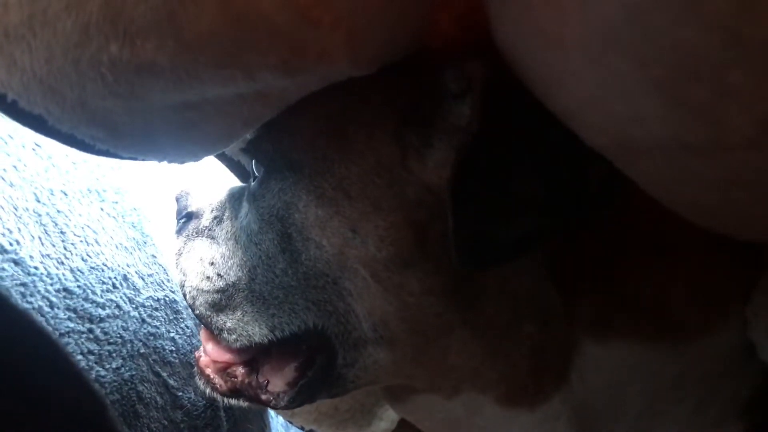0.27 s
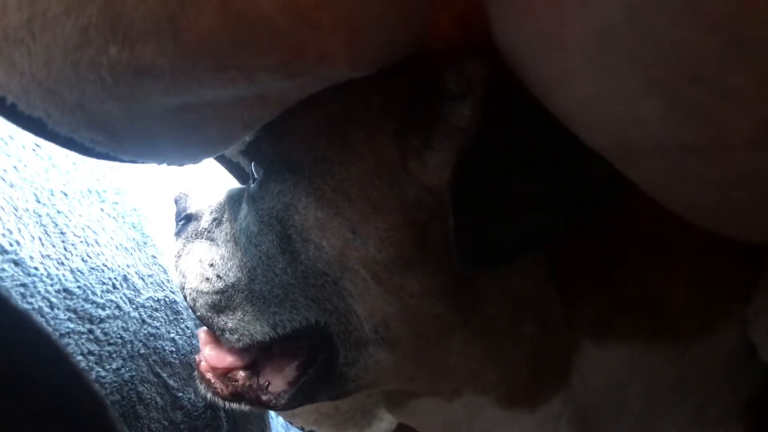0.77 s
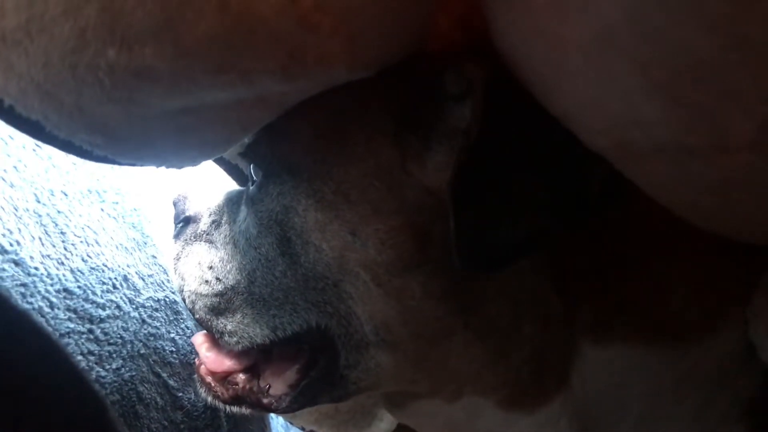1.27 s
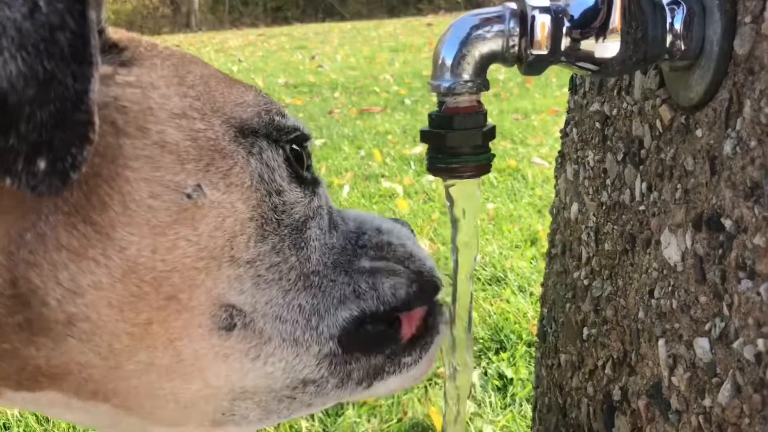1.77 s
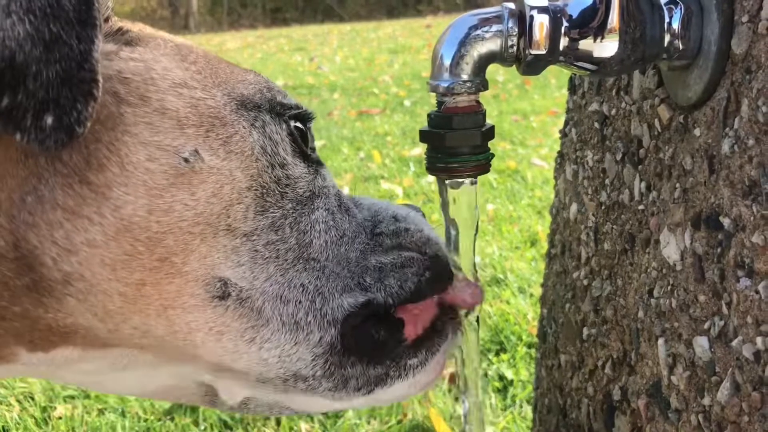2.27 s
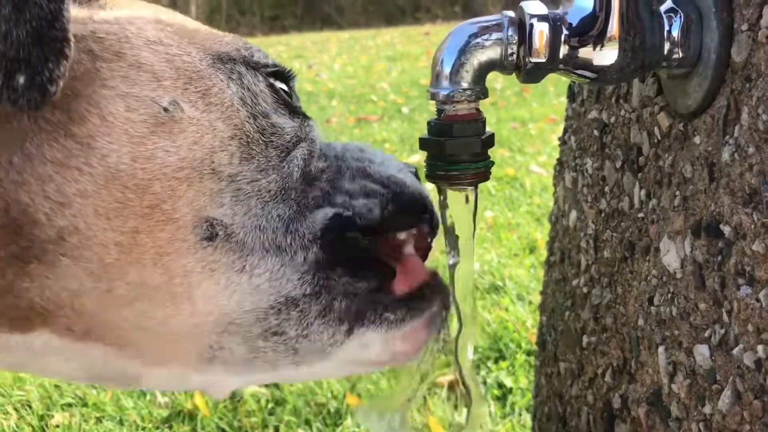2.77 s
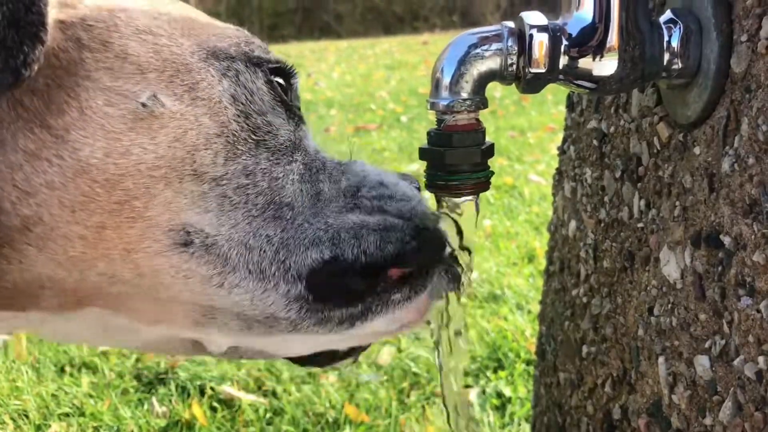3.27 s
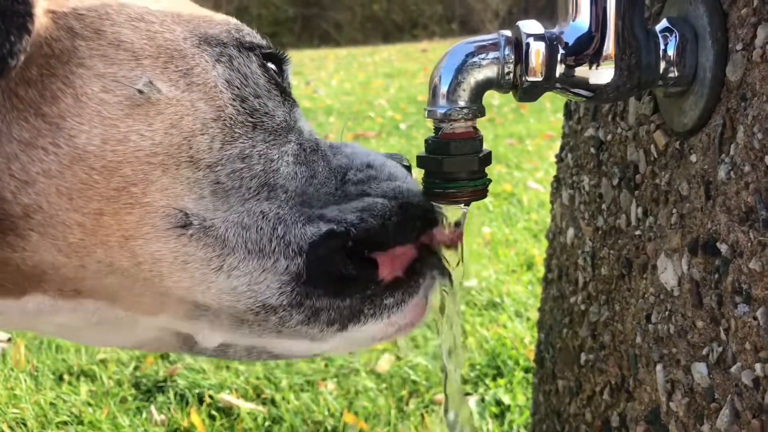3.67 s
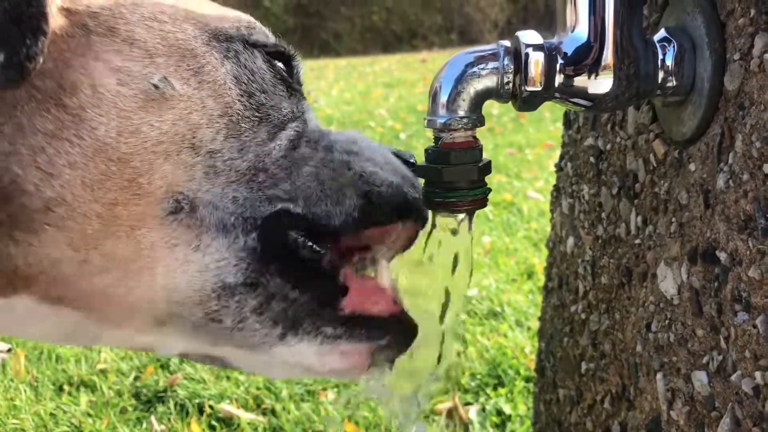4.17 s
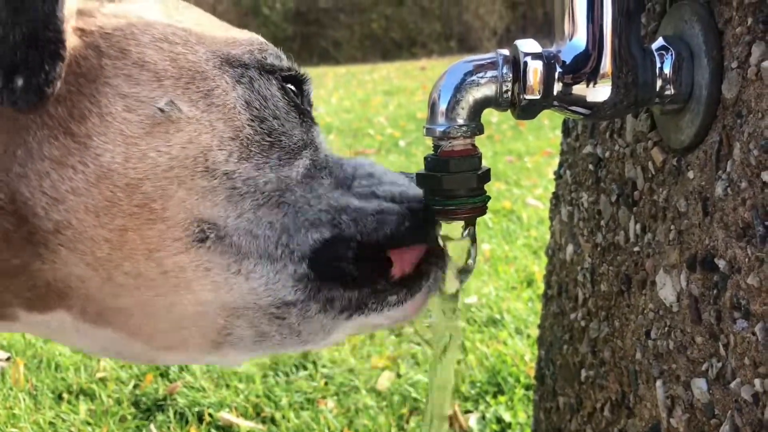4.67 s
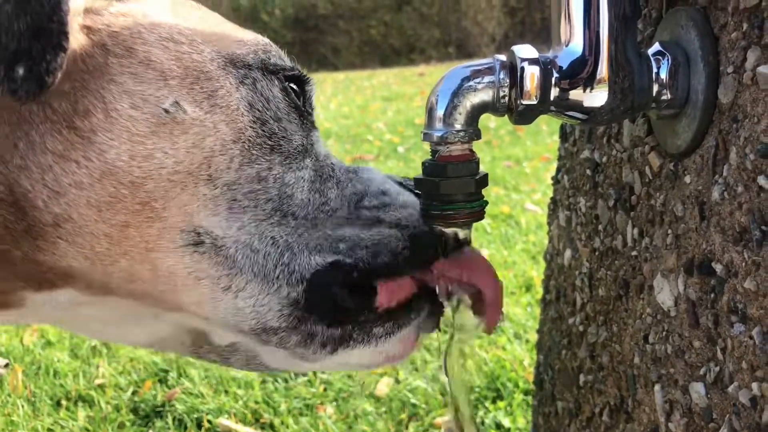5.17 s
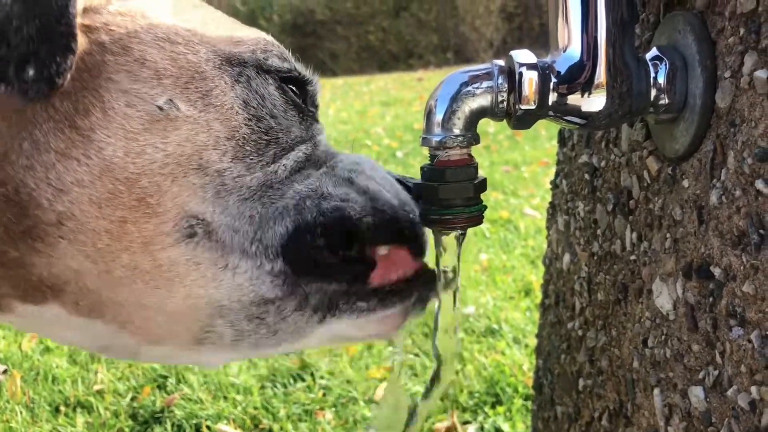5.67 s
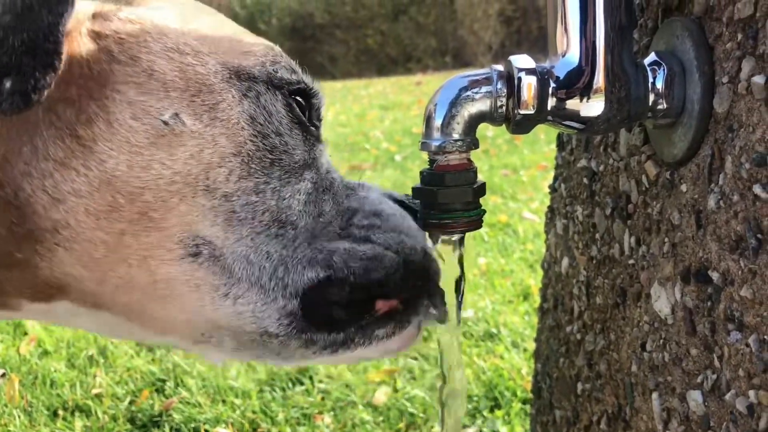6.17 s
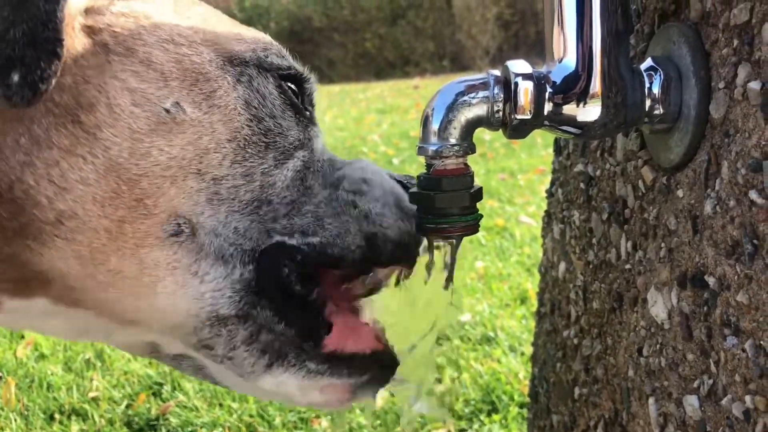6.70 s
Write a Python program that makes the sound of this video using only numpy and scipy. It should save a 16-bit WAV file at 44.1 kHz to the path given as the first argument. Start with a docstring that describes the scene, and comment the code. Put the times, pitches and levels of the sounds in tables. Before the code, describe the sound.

First a deep, soft hum climbs in pitch, swells and drops away. Then abruptly an outdoor tap runs, its thin stream pattering and hissing on wet ground, while a dog laps right at the microphone: quick slurps, sticky smacks, splashes, crisp water snaps and a few hollow mouth clucks, about three laps a second. A faint low rumble and distant machinery hum lie underneath.

```python
"""A dog laps at the stream of an outdoor tap, close to the microphone, after a low hum has swelled and gone.
Its tongue smacks as torn noise through mouth resonances; air pockets, drips and wet films ring as short pings.
Slurps and spray are bubble showers and noise driven lap by lap; slipping knocks make the throat cluck.
Under it the stream patters as bubbles and hiss, over a filtered-noise rumble and far machinery of sine tones."""
import sys
import numpy as np
from scipy import signal
from scipy.fft import rfft, irfft
from scipy.io import wavfile
from scipy.ndimage import uniform_filter1d

SR = 44100
rng = np.random.default_rng(int(sys.argv[2]) if len(sys.argv) > 2 else 0)


def output_pcm(signal):
    """Save a mono or channel-first signal as 16-bit PCM at the path in sys.argv[1].

    Samples are clipped to [-1, 1] before scaling.
    """
    pcm = np.clip(np.atleast_2d(signal).T, -1, 1) * 32767
    wavfile.write(sys.argv[1], SR, np.round(pcm).astype(np.int16))


N = 305771

TAP_START_S = 1.672  # the hum gives way to the tap and the dog
TOP_HZ = 15900  # upper edge of the recorded band


def undb(db):
    """Decibels to gain."""
    return 10 ** (np.asarray(db) / 20)


def unit(x):
    """Scale to rms 1."""
    return x / np.sqrt(np.mean(x ** 2))


def curves(table):
    """Draw straight lines through each column of a table, one value a sample."""
    s, *columns = np.transpose(table)
    return [np.interp(np.arange(N) / SR, s, c) for c in columns]


def add(out, s, sound):
    """Mix a short sound in at time s."""
    i = min(max(int(s * SR), 0), N)
    out[i:i + len(sound)] += sound[:N - i]


def filtered(x, points, size=4096):
    """Causal, minimum-phase filter through (Hz, dB) points."""
    hz, db = np.transpose(points)
    bins = np.maximum(np.arange(size // 2 + 1) * SR / size, 1)
    cepstrum = irfft(np.log(undb(np.interp(np.log(bins), np.log(hz), db))))
    # folding the cepstrum forward in time puts the energy first
    cepstrum[1:size // 2] *= 2
    cepstrum[size // 2 + 1:] = 0
    return signal.fftconvolve(x, irfft(np.exp(rfft(cepstrum))))[:N]


def colour(x, points):
    """Filter a sound through (Hz, dB) points, then set it to rms 1."""
    return unit(filtered(x, points))


def resonate(x, hz, width_hz):
    """One damped resonance, gain 1 at its centre."""
    return signal.lfilter(*signal.iirpeak(hz, hz / width_hz, fs=SR), x)


def walk(rate):
    """Smooth random wander at about this rate in Hz; spread 1."""
    k = max(int(SR / rate), 1)
    smooth = uniform_filter1d(rng.standard_normal(N), k, mode="wrap")
    return unit(uniform_filter1d(smooth, k // 2 + 1, mode="wrap"))


def ping(hz, open_s, glide):
    """An air pocket rings up as it opens, then dies away while its pitch slides."""
    age = np.arange(int(7 * open_s * SR) + 2) / (open_s * SR)
    pitch = np.minimum(hz * (1 + glide * np.tanh(age - 1)), SR / 2)
    swell = (age * np.exp(1 - age)) ** 1.53
    return swell * np.sin(2 * np.pi * np.cumsum(pitch) / SR)


def bubbles(rate, low_hz, high_hz, cycles, spread_db, glide, count=6000):
    """A random shower of pings of all sizes, rate a second, while the tap runs."""
    out, span = np.zeros(N), N / SR - TAP_START_S
    chance = rng.random((count, 3))
    size = np.clip(rng.standard_normal(count), -2, 2)
    for (when, pitch, ring), gain in zip(chance[:int(rate * span)], undb(spread_db * size)):
        hz = low_hz * (high_hz / low_hz) ** pitch
        open_s = cycles * (.5 + ring) / hz
        add(out, TAP_START_S + when * span, gain * ping(hz, open_s, glide))
    return unit(out)


def splash(hz, ratio, rise_s, decay_s):
    """A short burst of tearing water: noise within a frequency ratio of hz, peak rms near 1."""
    t = np.arange(SR // 20) / SR
    edges = [hz / (1 + ratio), min(hz * (1 + ratio), .45 * SR)]
    band = signal.butter(1, edges, "bandpass", fs=SR, output="sos")
    shape = np.tanh(t / rise_s) ** 2 * np.exp(-t / decay_s)
    return unit(signal.sosfilt(band, rng.standard_normal(len(t)))) * shape / shape.max()


def mist(flicker_db, rate, count=8):
    """Droplets too fine to tell apart: noise in bands that each sparkle on their own."""
    edges = np.linspace(2000, 17000, count + 1)
    out = np.zeros(N)
    for edge_pair in zip(edges, edges[1:]):
        band = signal.butter(2, edge_pair, "bandpass", fs=SR, output="sos")
        noise = signal.sosfilt(band, rng.standard_normal(N))
        out += noise * undb(flicker_db * walk(rate))
    return unit(out)


def rumble():
    """A low outdoor rumble of two noise layers; the upper one grows, so it sounds fuller."""
    # spectrum of the steady deep layer: freq_hz, gain_db [Hz, dB]
    deep_spectrum = [(22, -25.5), (35, -14), (60, 1.5), (125, 0), (170, -2), (320, -15), (450, -17.5),
                     (900, -37.5)]
    # spectrum of the growing upper layer: freq_hz, gain_db [Hz, dB]
    top_spectrum = [(100, -30.5), (170, 1), (225, 1), (320, -4), (450, -13), (900, -43.5)]
    # swell of the upper layer: time_s, level_db [s, dB]
    top_levels = [(2, -56.5), (3.8, -49), (6.9, -48)]
    top_db, = curves(top_levels)
    deep = undb(-43.0) * colour(rng.standard_normal(N), deep_spectrum)
    return deep + undb(top_db) * colour(rng.standard_normal(N), top_spectrum)


def engine():
    """Far machinery: an engine slowly gaining speed and overtones beside a steady hum, both wavering in level."""
    # speed of the far engine: time_s, firing_rate_hz [s, Hz]
    speed = [(1.7, 72.8), (3.5, 74.45), (6.9, 76.6)]
    # its harmonics: multiple, level_db [of the firing rate, dB rms before wavering]
    orders = [(1, -46.5), (2, -53), (3, -56.5)]
    drone_hz, drone_db = 121.6, -50.5
    open_s = 3.5  # the overtones have grown in by this time
    hz, = curves(speed)
    t = np.arange(N) / SR
    phase = 2 * np.pi * np.cumsum(hz) / SR
    opening = np.minimum(t / open_s, 1)
    firing = np.zeros(N)
    for k, db in orders:
        # higher harmonics open later
        firing += opening ** (k - 1) * undb(db + 2 * walk(1.94)) * np.sin(round(k) * phase)
    drone = undb(drone_db + 2 * walk(2.05)) * np.sin(2 * np.pi * drone_hz * t)
    return np.sqrt(2) * (firing + drone)


def hum():
    """A deep hum, perhaps an engine gathering speed, with thin upper tones and a dull rush."""
    # course of the hum: time_s, pitch_hz, upper_tone_hz, level_db [s, Hz, Hz, dB rms of the deep tone]
    course = [(0, 34.75, 159.3, -58), (.55, 35.44, 174, -48), (.8, 39.4, 185.7, -41),
              (1.15, 46.7, 205.2, -32), (1.38, 51.3, 216, -33), (1.5, 54.9, 226, -39.5),
              (1.66, 54, 236, -69)]
    # spectrum of the rush: freq_hz, gain_db [Hz, dB]
    rush_spectrum = [(20, -37), (35, -11), (65, 8), (130, -5), (280, -11.5), (450, -23), (1000, -32),
                     (2500, -39), (6000, -41.5), (16000, -48)]
    fade_start_s = 1.13  # the upper tone and the rush fade from here until the tap
    octave_db, octave_hold_s, octave_fall_db_per_s = -46, 0.41, 27
    t = np.arange(N) / SR
    hz, upper_hz, deep_db = curves(course)
    fade = np.clip((TAP_START_S - t) / (TAP_START_S - fade_start_s), 0, 1)
    overtone_db = octave_db - octave_fall_db_per_s * np.maximum(t - octave_hold_s, 0)
    # the upper tone and the rush take only a share of the swell
    upper_db = -48.5 + 0.26 * deep_db
    rush_db = -48.5 + 0.072 * deep_db
    phase = 2 * np.pi * np.cumsum(hz) / SR
    deep = np.sin(phase) + undb(-29) * np.sin(3 * phase)
    overtones = np.sin(2 * phase) + undb(-15) * np.sin(3 * phase)
    upper = np.sin(2 * np.pi * np.cumsum(upper_hz) / SR) + undb(-15) * np.sin(6.7 * phase)
    tones = undb(deep_db) * deep * (t < TAP_START_S)
    tones = tones + undb(overtone_db) * overtones + fade * undb(upper_db) * upper
    rush = undb(rush_db) * colour(rng.standard_normal(N), rush_spectrum)
    return np.sqrt(2) * tones + fade * rush


def stream():
    """The jet lands on wet ground: dense patter, sparser longer-ringing gurgles, fizzing droplets, fine hiss."""
    # the jet hitting the ground: time_s, level_db [s, dB before swaying]
    jet = [(1.7, -43.5), (2.5, -47.5), (3, -45), (6.9, -45.5)]
    # spectrum of the landing jet: freq_hz, gain_db [Hz, dB]
    spectrum = [(200, -27), (420, -2), (560, -3), (690, -4.5), (880, -7.5), (1200, -6), (1680, -10),
                (2150, -15), (4000, -17.5), (6200, -14.5), (9000, -37), (16000, -22)]
    jet_db, = curves(jet)
    patter = bubbles(rate=650, low_hz=520, high_hz=2310, cycles=2.1, spread_db=4, glide=0.12)
    gurgle = 0.75 * bubbles(rate=45, low_hz=600, high_hz=2300, cycles=3.6, spread_db=2.5, glide=0.1)
    fizz = bubbles(rate=900, low_hz=2300, high_hz=16000, cycles=2.2, spread_db=7, glide=0.07)
    hiss = rng.standard_normal(N)
    sway_db = 1.3 * walk(25)
    water = 0.36 * (patter + gurgle) + 0.5 * fizz + 0.5 * hiss
    return undb(jet_db + sway_db) * colour(water, spectrum)


def clucks(gap_s=0.0055, count=5):
    """The tongue peels off the palate in uneven slips; each knocks the mouth cavity, which rings briefly."""
    # clucks deep in the mouth: start_s, pitch_hz, level_db, length_s [s, Hz at the first slip, dB, s]
    cluck_table = [(3.9555, 507, -25.5, .013), (4.2858, 610, -23, .021), (5.3953, 600, -23.5, .016),
                   (5.735, 625, -23.5, .02), (6.499, 594, -26.5, .013), (6.843, 610, -25, .013)]
    # the cavity shrinks as the tongue lifts, so its pitch climbs from slip to slip by this share a second
    rise_per_s, ring_s = 5.8, 0.0021
    out, t = np.zeros(N), np.arange(SR // 20) / SR
    knock = (1 - np.exp(-t / .0005)) * np.exp(-t / ring_s)
    for s, hz, db, length in cluck_table:
        for k, (late, size, detune) in enumerate(rng.standard_normal((count, 3))):
            if k * gap_s < length:
                pitch = hz * (1 + rise_per_s * k * gap_s + .06 * detune)
                slip = 2 * knock * np.sin(2 * np.pi * pitch * t)
                add(out, s + gap_s * (k + 0.1 * late), undb(db + 1.5 * size) * slip)
    return signal.sosfilt(signal.butter(2, 260, "highpass", fs=SR, output="sos"), out)


def snaps():
    """A film breaks in a cycle or two and leaves a few milliseconds of mist."""
    # water films snapping: start_s, pitch_hz, level_db [s, Hz, dB shared by ping and mist]
    snap_table = [(1.873, 8900, -13.5), (1.962, 12500, -21), (1.9706, 12800, -14.5), (2.0817, 12600, -12),
                  (2.096, 12500, -17), (2.1576, 8650, -22.5), (2.1891, 7500, -13), (2.56, 12520, -20),
                  (2.6173, 8200, -20), (2.6905, 10200, -21.5), (2.8833, 10500, -16.5), (2.89, 9700, -16),
                  (3.118, 14700, -13.5), (3.216, 14100, -15), (3.247, 13100, -22), (3.3354, 14800, -20),
                  (3.3574, 11600, -20), (3.8355, 9090, -22), (3.967, 11300, -20.5), (4.021, 9000, -21),
                  (4.543, 9100, -21), (5.069, 12400, -16.5), (5.0902, 8300, -18), (5.2225, 12970, -16),
                  (5.4294, 11400, -19), (5.708, 15000, -19), (5.7508, 8200, -8), (5.994, 6900, -17.5),
                  (6.1013, 11300, -23), (6.1213, 12400, -18), (6.1433, 11000, -21), (6.539, 12690, -16.5),
                  (6.557, 9500, -8.5), (6.8703, 8300, -20), (6.904, 11400, -14), (6.913, 11300, -21.5)]
    out = np.zeros(N)
    for s, hz, db in snap_table:
        add(out, s, undb(db + 4.5) * ping(hz, .95 / hz, glide=-.1))
        add(out, s, undb(db - 10) * splash(hz, ratio=.6, rise_s=.0004, decay_s=.0011))
    return out


def drips():
    """Single bubbles chirp as they near the surface or are drawn into the mouth."""
    # clean sliding bubbles: start_s, pitch_hz, peak_db, open_s, glide [s, Hz, dB, s, share of the pitch]
    drip_table = [(1.745, 1930, -36, 0.003, -0.023), (2.067, 1940, -39, 0.0072, -0.04),
                  (2.633, 3260, -24, 0.0015, 0.21), (2.7038, 4080, -21, 0.0025, 0.71),
                  (3.324, 4650, -26.5, 0.001, 0.27), (3.5813, 6020, -17.5, 0.0011, 0.17),
                  (4.495, 1370, -34, 0.0046, 0.0056), (6.042, 734, -21, 0.0057, -0.11),
                  (6.462, 2380, -34, 0.0026, .04)]
    out = np.zeros(N)
    for s, hz, db, open_s, glide in drip_table:
        add(out, s, undb(db) * ping(hz, open_s, glide))
    return out


def pops(count=3):
    """Each pocket rings at its own pitch; water around it tears and throws off a few smaller bubbles."""
    # air pockets at tongue and lips: start_s, pitch_hz, peak_db, tear_s [s, Hz, dB, s of the tear's rise]
    pop_table = [(1.867, 706, -33.5, .0014), (1.926, 3230, -34, 0.0008), (1.984, 4360, -27.5, 0.00065),
                 (2.117, 4470, -20, 0.0006), (2.1688, 5330, -19.5, 0.00032), (2.1917, 2560, -31.5, .0009),
                 (2.198, 6220, -21, 0.00028), (2.306, 6350, -24.5, 0.00021), (2.535, 6400, -22, 0.00014),
                 (2.5495, 6260, -16, 0.0003), (2.748, 3260, -13, 0.00023), (2.7663, 686, -27.5, 0.0029),
                 (2.857, 6250, -20.5, 0.00048), (3.0545, 4430, -26, 0.00044), (3.0848, 3900, -24, 0.00048),
                 (3.1094, 3800, -21.5, 0.00053), (3.1732, 1636, -6.5, 0.0011), (3.222, 586, -23.5, 0.00085),
                 (3.266, 3600, -28.5, 0.0014), (3.3138, 2350, -20, 0.00025), (3.3355, 3700, -25, 0.00033),
                 (3.3663, 3160, -13.5, 0.00029), (3.599, 3920, -19, 0.0004), (3.669, 5230, -13, 0.000078),
                 (3.693, 2730, -16.5, 0.00017), (3.905, 1870, -18.5, 0.0018), (3.911, 1780, -15, 0.001),
                 (4.0101, 1930, -16, 0.0003), (4.0395, 5600, -19, 0.0003), (4.3746, 5800, -11.5, 0.000063),
                 (4.383, 5660, -16.5, 0.00018), (4.4483, 6440, -9, 0.00032), (4.74, 5670, -16.5, 0.00023),
                 (4.7559, 940, -21, 0.00056), (4.807, 5800, -18, 0.00056), (4.9062, 3730, -25.5, 0.00075),
                 (4.943, 670, -29, 0.003), (5.058, 596, -25.5, 0.0022), (5.0678, 2950, -21, 0.0012),
                 (5.0941, 4250, -23.5, 0.00039), (5.2223, 527, -29.5, 0.0029), (5.1385, 6330, -23, 0.00024),
                 (5.4136, 5160, -12, 0.00021), (5.478, 2900, -24.5, 0.00034), (5.6989, 2330, -17.5, 0.0019),
                 (5.748, 2800, -31, 0.0009), (5.8015, 4200, -32, 0.00022), (6.1058, 2420, -23, .001),
                 (6.115, 2460, -14, 0.0011), (6.1598, 4380, -20.5, 0.0003), (6.1952, 2880, -15, 0.00021),
                 (6.2039, 4060, -18, 0.00024), (6.2074, 638, -28, 0.0054), (6.3172, 3490, -26.5, 0.0014),
                 (6.4436, 670, -28, 0.002), (6.4886, 4560, -24, 0.00073), (6.568, 2350, -20, 0.00043),
                 (6.5815, 1280, -28.5, 0.0012), (6.591, 1000, -30, 0.001), (6.6665, 1040, -19, 0.0018),
                 (6.6996, 4100, -18, 0.00018), (6.9038, 5370, -13.5, 0.00023)]
    out = np.zeros(N)
    for s, hz, db, tear_s in pop_table:
        # the pocket opens a little slower than the water tears
        add(out, s, undb(db) * ping(hz, tear_s * 1.18, glide=0.068))
        tear = splash(min(1.3 * hz, TOP_HZ), ratio=0.8, rise_s=tear_s, decay_s=.0016)
        add(out, s, undb(db - 16) * tear)
        for late, smaller in rng.random((count, 2)):
            small_hz = min(hz * (2.33 + 2.9 * smaller), TOP_HZ)
            add(out, s + 6 * tear_s * late, undb(db - 18.0) * ping(small_hz, 3.0 / small_hz, glide=0.065))
    return out


def smacks(tears_per_s=1500):
    """A wet film tears in a run of clicks, then a few stragglers; they ring the mouth, each smack its own way."""
    # the tongue leaves the palate: start_s, lower_hz, upper_hz, level_db, swell_s
    # [s, Hz and Hz of the mouth resonances, dB, s]
    smack_table = [(2.829, 1220, 1820, -31.5, 0.0029), (3.571, 1940, 4100, -27.5, 0.004),
                   (3.9048, 1240, 1820, -24.5, 0.0027), (4.036, 1330, 2360, -29, 0.00042),
                   (4.1237, 1130, 2340, -27.5, 0.002), (4.245, 1210, 2260, -32.5, 0.0031),
                   (4.4435, 980, 1590, -26, 0.0014), (4.992, 1170, 2160, -31, 0.0028),
                   (4.998, 1220, 2170, -20.5, 0.0014), (5.131, 696, 1630, -31.5, 0.0019),
                   (5.222, 1120, 2620, -30, 0.0015), (5.344, 1120, 2360, -29, 0.0031),
                   (5.697, 775, 2340, -24, 0.0017), (6.204, 1110, 1710, -32, 0.0036),
                   (6.443, 1190, 2400, -27, 0.0028), (6.559, 1610, 2470, -32, 0.0025),
                   (6.665, 1020, 2360, -35, 0.0029), (6.794, 1310, 1750, -34.5, 0.0054)]
    lower_width_hz, upper_width_hz = 220, 190  # soft cheeks damp the mouth resonances
    teeth_hz, teeth_db, teeth_width_hz = 3530, -13, 220  # the small cavity behind the front teeth
    tail_share, tail_s = 0.12, 0.013  # the last threads of saliva parting
    out, t = np.zeros(N), np.arange(SR // 20) / SR
    for s, lower_hz, upper_hz, db, swell_s in smack_table:
        shape = t / swell_s * np.exp(1 - t / swell_s) + tail_share * np.exp(-t / tail_s)
        noise = rng.standard_normal(len(t))
        clicks = rng.random(len(t)) < tears_per_s / SR
        tear = shape * noise * (clicks + .04)  # sparse clicks over a faint floor
        ring = resonate(tear, lower_hz, lower_width_hz)
        ring = ring + undb(-3) * resonate(tear, upper_hz, upper_width_hz)
        ring = ring + undb(teeth_db) * resonate(tear, teeth_hz, teeth_width_hz)
        # the energy follows the swell's shape, however the random tears fall
        add(out, s, undb(db) * ring * np.linalg.norm(shape) / np.linalg.norm(ring))
    return out


def tongue():
    """Gains in the mouth and at the lips: a slurp swells and stops, the tongue hits the jet, then pulls back."""
    # laps: smack_s, slurp_db, hit_wait_s, splash_db, release_s, pull_wait_s, pull_db
    # [s, dB, s after the smack, dB, s, s after the smack, dB]
    laps = [(1.816, -53.5, 0.18, -38.5, 0.0066, 0.12, -50), (2.089, -65, 0.088, -42, 0.11, 0.3, -63),
            (2.529, -40, 0.088, -40.5, 0.48, .22, -44.5), (2.84, -52, 0.051, -38.5, 0.013, 0.23, -42.5),
            (3.178, -40, 0.082, -41, 0.11, 0.29, -40.5), (3.578, -36, 0.089, -35, 0.12, 0.24, -39.5),
            (3.906, -38, 0.064, -33.5, 0.019, 0.23, -37), (4.247, -39, 0.055, -42, 0.26, 0.22, -44.5),
            (4.667, -39, 0.074, -34, 0.041, 0.24, -36), (5.003, -41, 0.071, -37, 0.18, 0.24, -37),
            (5.352, -41.5, 0.053, -35, 0.067, 0.23, -42.5), (5.707, -36, 0.079, -31, 0.023, 0.11, -65),
            (6.115, -35, 0.076, -31.5, 0.041, 0.22, -40), (6.455, -36, 0.054, -33, 0.068, 0.23, -40.5),
            (6.803, -40.5, 0.071, -39, 0.042, 0.23, -43)]
    suck_rise_s, suck_shut_s = 0.03, 0.0082  # the slurp builds towards the smack and stops as the jaws shut
    splash_attack_s, splash_hold_s = 0.0069, 0.01
    pull_back_width_s = 0.018  # the tongue drags water into the mouth in a short swell
    suck_spray_db, splash_slurp_db = 2.5, -14.5  # spray thrown by a slurp; froth stirred by a splash
    trickle_mouth_db, trickle_lips_db = -62.5, -47.5  # the jet running over the muzzle between laps
    t = np.arange(N) / SR
    suck, hit = np.zeros(N), np.zeros(N)
    for s, slurp_db, wait_s, splash_db, release_s, pull_s, pull_db in laps:
        age = t - s
        suck += undb(slurp_db) * np.exp(np.minimum(age / suck_rise_s, -age / suck_shut_s))
        suck += undb(pull_db) * np.exp(-np.abs(age - pull_s) / pull_back_width_s)
        attack = np.clip((age - wait_s) / splash_attack_s, 0, 1)
        release = np.exp(-np.maximum(age - wait_s - splash_hold_s, 0) / release_s)
        hit += undb(splash_db) * attack * release
    # the parts add as powers
    mouth = np.hypot(np.hypot(suck, undb(splash_slurp_db) * hit), undb(trickle_mouth_db))
    lips = np.hypot(np.hypot(hit, undb(suck_spray_db) * suck), undb(trickle_lips_db))
    return mouth, lips


def lapping():
    """The tongue churns the jet: froth and stray pops in the mouth, spray and stray snaps at the lips."""
    # spectrum of the slurp in the mouth: freq_hz, gain_db [Hz, dB]
    slurp_spectrum = [(400, 9.5), (700, -2), (1150, -1.5), (1750, 5.5), (2400, -2.5), (2900, -6),
                      (3800, -1), (5200, -14), (8000, -56)]
    # spectrum of the spray at the lips: freq_hz, gain_db [Hz, dB]
    spray_spectrum = [(2500, -15), (4200, 0), (6000, 1), (8000, 0), (12500, -2), (16000, -4)]
    mouth, lips = tongue()
    spurts = undb(3.2 * walk(130))  # shared by slurp and spray
    froth = bubbles(rate=480, low_hz=1000, high_hz=5200, cycles=2.0, spread_db=5, glide=0.08)
    froth = unit(np.diff(froth, prepend=0))  # small bubbles radiate better
    slurp = colour((froth + 0.5 * rng.standard_normal(N)) * spurts, slurp_spectrum)
    drops = bubbles(rate=770, low_hz=3660, high_hz=15640, cycles=3.9, spread_db=6.0, glide=0.049)
    drops = unit(np.diff(drops, prepend=0))
    spray = colour((0.55 * drops + mist(flicker_db=8.0, rate=150)) * spurts, spray_spectrum)
    stray_pops = bubbles(rate=50, low_hz=1100, high_hz=5500, cycles=2.5, spread_db=3, glide=0.12)
    stray_snaps = bubbles(rate=45, low_hz=4500, high_hz=14500, cycles=0.8, spread_db=3.5, glide=-0.05)
    in_mouth = undb(-0.9) * slurp + undb(-7) * stray_pops
    at_lips = undb(-2.5) * spray + undb(-5.5) * stray_snaps
    return mouth * in_mouth + lips * at_lips


def surroundings(x, echo_db, decay_s, count=6):
    """Muzzle, tap and post scatter very short echoes that shift as the head and the water move."""
    t = np.arange(SR // 20) / SR
    scattered = np.zeros(N)
    for noise in rng.standard_normal((count, len(t))):
        echo = noise * np.exp(-t / decay_s) * (t > .001)
        scattered += walk(31.0) * signal.oaconvolve(x, echo / np.linalg.norm(echo))[:N]
    return x + undb(echo_db) * scattered / np.sqrt(count)


def scene():
    """First the hum alone, then the tap and the dog."""
    mouth_sounds = lapping() + smacks() + pops() + drips() + snaps() + clucks()
    dog = surroundings(mouth_sounds, echo_db=-11, decay_s=0.003)
    fade_in = np.clip((np.arange(N) / SR - TAP_START_S) / 0.016, 0, 1)
    return (hum() + fade_in * (dog + stream() + rumble() + engine()))[None]


def record(dry):
    """The microphone ripples the treble and the recorder cuts the top."""
    # microphone response: freq_hz, gain_db [Hz, dB]
    response = [(4200, 0), (4900, -3), (5600, -0.5), (6500, -1), (7600, -2.5), (8500, 0), (9400, 1.5),
                (10500, -3), (11300, 2), (13000, 3.5), (15500, 2)]
    top_cut = signal.ellip(8, .2, 70, TOP_HZ, fs=SR, output="sos")
    return signal.sosfilt(top_cut, filtered(dry[0], response))[None]


dry = scene()
out = record(dry)
output_pcm(out)
```